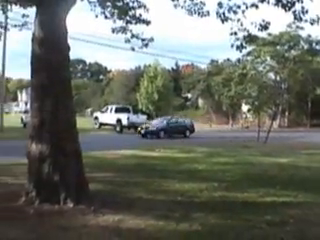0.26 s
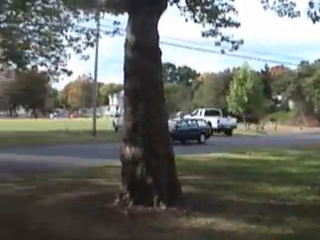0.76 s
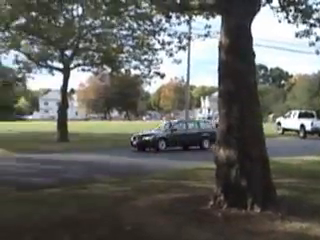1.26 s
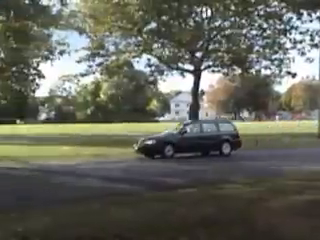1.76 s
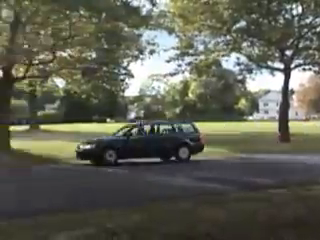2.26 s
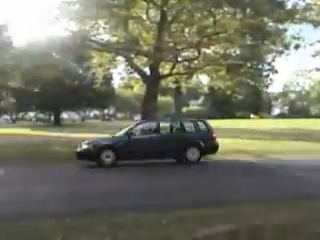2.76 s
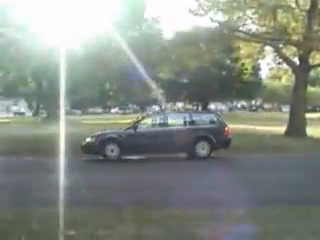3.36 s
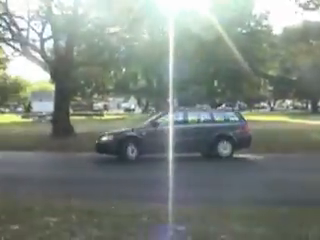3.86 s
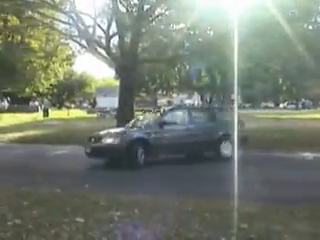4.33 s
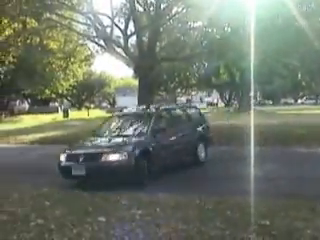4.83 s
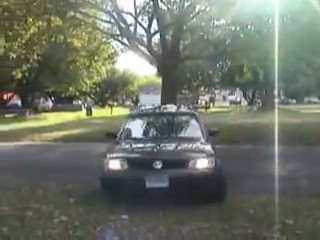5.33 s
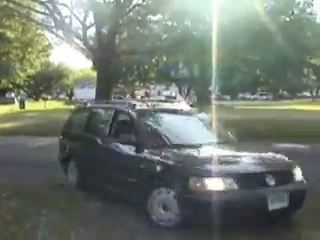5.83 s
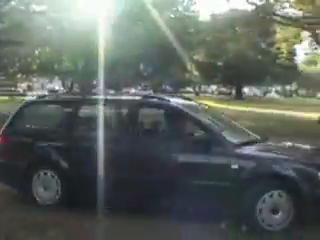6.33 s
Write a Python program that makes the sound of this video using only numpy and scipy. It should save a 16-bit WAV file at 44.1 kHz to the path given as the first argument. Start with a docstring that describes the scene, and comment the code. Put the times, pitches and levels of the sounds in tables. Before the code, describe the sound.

A car sweeps past on asphalt, slows, turns with a stuttering tyre squeal, and rolls up close with whining brakes, crackling dry leaves and an idling engine nearby.

```python
"""Tyres roar and hiss over asphalt as an estate car crosses a park, lifts off and swings round with a squeal.
Its brakes sing as it rolls onto a lawn close to a camera, where dry leaves crunch and twigs snap.
Another engine idles nearby throughout, a small motor hums faintly, and wind buffets the microphones.
Tyres, leaves and knocks are shaped noise, clicks and ringing modes; squeal and brakes are unsteady tones.
Engines and motor are harmonics of a slowly wandering rate."""
import sys
import numpy as np
from scipy import signal
from scipy.fft import rfft, irfft
from scipy.io import wavfile

SR = 44100
rng = np.random.default_rng(int(sys.argv[2]) if len(sys.argv) > 2 else 0)


def to_wav(s):
    """Save 16-bit WAV."""
    ch = np.atleast_2d(s).T  # columns
    pcm = np.round(np.clip(ch, -1, 1) * 32767)  # PCM
    wavfile.write(sys.argv[1], SR, pcm.astype(np.int16))


N = 290619
T = np.arange(N) / SR  # seconds
HZ = np.fft.rfftfreq(N, 1 / SR)


def wheels(grit_db=-2.0):
    """Everything the four tyres do on asphalt and lawn, with grit popping from under them."""
    # Pops: grit from under the tyres, plus clicks heard with the case ticks at 0.79 and 4.87 s. # Each row:
    # start in seconds, peak in dB before the grit trim.
    pop_rows = [(.7931, -17.5), (1.6202, -12.5), (2.3645, -20), (2.828, -17.5), (3.1418, -24),
                (4.8653, -26)]
    # Spectrum of a pop. Each row: frequency in Hz, density in dB per Hz.
    pop_colour = [(1500, -20), (3800, 6), (5000, 4.5), (6500, 8), (8000, 0.5), (11000, -28)]
    pops = cracks(pop_rows, pop_colour, decay=0.0029, tail_db=-7.0, tail=0.026)
    return rolling() + tread_drone() + tyre_squeal() + leaves() + flares() + gain_of(grit_db) * pops + knocks()


def rolling(roar_db=-1.5, hiss_db=1.5, rumble_db=1.0, fizz_db=-30.5):
    """Tread roar, air pumped out of the grooves, body rumble and fine grit; humps load the tyres."""
    # Tyre loudness, rising with the car's pull and sinking as it slows. Each row: time in seconds, gain in dB.
    tyre_rows = [(0, -29.5), (.75, -30), (1.06, -32.5), (1.3, -29.5), (1.47, -27), (1.9, -26),
                 (2.45, -27.5), (3.05, -32.5), (3.5, -33.5), (4.35, -29), (4.8, -34), (6.59, -38.5)]
    # Brightness, added to the hiss and taken from the roar. Each row: time in seconds, shift in dB.
    bright_rows = [(0, 0), (1.8, 0.66), (3, -3.5), (4.2, -1.5)]
    # Body and road rumble. Each row: time in seconds, gain in dB.
    rumble_rows = [(0, -29.5), (2.2, -30.5), (2.9, -28.5), (4.1, -28), (4.4, -31.5), (6.59, -31.5)]
    # Wheels heaving over the verge and humps in the lawn.
    # Each row: centre in seconds, extra roar in dB, half-length in seconds, extra rumble in dB.
    humps = [(4.92, 3.5, .13, 6), (5.127, 6.5, 0.1, 2), (5.92, 7, 0.13, -2), (6.382, 6.5, 0.055, 0.5)]
    # Spectra of roar, hiss, rumble and grit fizz. Each row: frequency in Hz, density in dB per Hz.
    roar_colour = [(200, -19), (480, -6.5), (650, 2.5), (800, 4), (920, -0.5), (1100, -10), (1500, -11),
                   (3000, -57.5)]
    hiss_colour = [(500, -13.5), (900, -0.5), (1200, -1), (1550, -2), (1900, -2), (2250, -6), (2700, -4),
                   (3300, -13.5), (4300, -15.5), (5300, -21.5), (6700, -22.5), (8500, -56), (12000, -67.5)]
    rumble_colour = [(15, -36), (33, -13), (55, -4), (85, 2.5), (115, -3), (180, 3.5), (250, 0),
                     (340, -2.5), (500, -7.5), (900, -17), (2500, -66.5)]
    fizz_colour = [(300, -5), (1500, -0.5), (3000, -4), (4200, -4.5), (5300, -8), (6700, -8), (7600, -11),
                   (8800, -24), (11000, -38.5)]

    tyres_db, bright_db = curve(tyre_rows), curve(bright_rows)
    load_db = sum(db * swell(s, length) for s, db, length, _ in humps)
    heave_db = sum(db * swell(s, length) for s, _, length, db in humps)
    # the fizz grows by 1.5 dB per second as the car nears, and follows a share of the tyre loudness
    near_db = 1.5 * T + 0.29 * tyres_db
    roar_gain = gain_of(roar_db + tyres_db - bright_db + load_db + 1.0 * drift(48))
    roar = roar_gain * noise(roar_colour)
    hiss_gain = gain_of(hiss_db + tyres_db + bright_db + 0.5 * drift(25))
    hiss = hiss_gain * noise(hiss_colour)
    rumble_gain = gain_of(rumble_db + heave_db + 0.75 * drift(24)) * level(rumble_rows)
    rumble = rumble_gain * noise(rumble_colour)
    fizz_gain = gain_of(fizz_db + near_db + 1.4 * drift(10.8))
    fizz = fizz_gain * evened(colour(grains(14000, 0.58), fizz_colour))
    return roar + hiss + rumble + fizz


def tread_drone(width=66.0):
    """The tread pattern drums a fuzzy low note whose pitch moves with the wheels."""
    # The drone. Each row: time in seconds, pitch in Hz, level in dB.
    drone_rows = [(2.1, 320, -50), (2.45, 300, -33), (3.15, 215, -32), (3.7, 195, -34), (4.2, 200, -46),
                  (4.549, 235, -29), (4.9, 215, -40.5), (5.15, 300, -26), (5.4, 320, -50.5)]
    s, hz, db = np.transpose(drone_rows)
    return gain_of(np.interp(T, s, db)) * fuzzy_tone(np.interp(T, s, hz), width)


def tyre_squeal(scrub_follow=0.96):
    """The front tyre grabs and lets go in gliding yelps, over a fuzzy tread ring and scrubbing rubber."""
    # The yelps. Each row: centre in seconds, gain in dB, half-length in seconds, pitch in Hz,
    # glide to either side in Hz, roughness (share of full pitch jitter), extra overtones in dB.
    yelps = [(3.733, -21, 0.038, 925, 30, 0.4, -1), (3.772, -15, 0.014, 958, 8, 0.3, 16.5),
             (3.803, -17, 0.021, 1015, 20, 0.47, 10), (3.847, -17.5, 0.026, 1080, 10, 0.55, 2),
             (3.918, -16.5, 0.02, 1061, 20, 0.29, 13.5), (3.954, -14, 0.0282, 1090, -10, 0.29, 8.5),
             (4.008, -10.5, 0.023, 976.3, -20, 0.57, 7.5), (4.038, -12, 0.0114, 950, -15, 0.71, -3),
             (4.089, -12.5, 0.015, 1000, 10, 0.92, 2.5), (4.132, -16, 0.018, 995, -35, 0.69, -2),
             (4.157, -10, .015, 952.5, -10, 0.22, 3), (4.194, -22.5, .03, 910, -10, .8, 3),
             (4.235, -20, 0.011, 905, 5, 0.38, 19.5), (4.251, -14, 0.01304, 950, -15, 1.1, 6),
             (4.299, -26, 0.024, 870, -20, 0.74, 8), (4.386, -23.5, .016, 835, 10, 0.37, 6),
             (4.425, -20, 0.023, 840, -10, 0.25, 0), (4.525, -26.5, 0.042, 880.2, 20, 0.28, 0),
             (5.123, -28, 0.041, 900, -10, 0.8, 2), (6.375, -29, .03, 865, 10, .6, 5)]
    # Spectrum of the scrub. Each row: frequency in Hz, density in dB per Hz.
    scrub_colour = [(500, -20), (720, -2), (830, 6), (1080, 2.5), (1250, -4.5), (1550, -1.5), (1900, 1),
                    (2300, -2), (2750, -1.5), (3400, -14), (6500, -26.5), (9000, -58)]
    slide_start_s, slide_end_s, attack_s, release_s = 3.71, 4.23, 0.092, 0.38
    scrub_db, ring_db = -22.5, -11.5  # the ring is relative to the yelps' envelope
    ring_hz, ring_width = 1050, 76

    sizes = np.array([gain_of(db) * swell(s, length) for s, db, length, *_ in yelps])
    # where yelps overlap, the stronger one dominates pitch and roughness
    shares = sizes ** 2 + 1e-12
    shares /= shares.sum(axis=0)
    pitch = np.zeros(N)
    for share, (s, _, length, hz, glide, *_) in zip(shares, yelps):
        pitch += share * (hz + glide * np.tanh((T - s) / length))
    rough, edge_db = np.array([row[-2:] for row in yelps]).T @ shares
    grip = np.linalg.norm(sizes, axis=0)
    sliding = held(slide_start_s, slide_end_s, attack_s, release_s)
    scrub_gain = gain_of(scrub_db + 1.7 * drift(60)) * (sliding + scrub_follow * grip)
    scrub = scrub_gain * noise(scrub_colour)
    ring = gain_of(ring_db) * grip * sliding * fuzzy_tone(ring_hz, ring_width)
    return grip * stick_slip(pitch, rough, edge_db) + ring + scrub


def stick_slip(pitch, rough, edge_db, octave_db=-11.5, third_db=-21.0,
               main_db=-2.0, second_db=-11.5, second_ratio=0.92):
    """Tread blocks stick and slip at an unsteady rate; a second tyre sings lower."""
    # How the tyre radiates its squeal. Each row: frequency in Hz, gain in dB.
    tyre_body = [(600, -9.5), (800, 0.5), (1100, 2), (1500, -7), (1930, -0.5), (2120, -4.5), (2300, -14),
                 (2800, -5), (3600, -21.5)]
    out = np.zeros(N)
    # the second tyre is less loaded, so its pitch is less steady
    for ratio, db, unsteady in ((1, main_db, rough), (second_ratio, second_db, 1.5)):
        jitter = unsteady * (0.015 * drift(60) + 0.05 * drift(300))
        flutter = gain_of(4 * np.tanh(drift(180)))
        angle = turning(pitch * ratio * (1 + jitter))
        # a harder grab sharpens each slip and so lifts the overtones
        overtones = gain_of(octave_db) * np.sin(2 * angle) + gain_of(third_db) * np.sin(3 * angle)
        out += gain_of(db) * evened(flutter) * (np.sin(angle) + gain_of(edge_db) * overtones)
    return np.sqrt(2) * colour(out, tyre_body)


def flares():
    """Patches of asphalt make one tyre resonance swell for a moment."""
    # The swells. Each row: centre in seconds, level in dB, half-length in seconds, pitch in Hz,
    # width setting of the fuzzy tone.
    flare_rows = [(0.523, -34, 0.32, 1497, 350.7), (1.544, -32, 0.15, 791, 80.2),
                  (1.741, -31, .1, 1815, 200), (2.038, -30.5, 0.13, 803, 90),
                  (2.276, -33, 0.092, 1218, 129.6), (4.07, -21.5, 0.077, 806, 45)]
    return sum(gain_of(db) * swell(s, length) * fuzzy_tone(hz, width) for s, db, length, hz, width in flare_rows)


def knocks(rattle=0.01):
    """A loose, rattling blow rings the suspension at each bump."""
    # Suspension knocks. Each row: start in seconds, gain in dB.
    knock_rows = [(3.158, -21), (5.111, -17.5), (5.135, -23), (5.243, -15), (5.255, -21.5), (6.037, -20)]
    # Suspension modes. Each row: frequency in Hz, relative level in dB, time to decay by 60 dB in seconds.
    modes = [(247, 5, 0.13), (458, 3, 0.045), (746, 2, 0.035), (910, -4.5, 0.043), (1090, 7.5, 0.016),
             (1310, 2.5, 0.021)]
    blow_colour = [(100, -10.5), (1400, 7), (2100, -4.5), (8000, -35)]  # Hz, dB per Hz
    t = T[:SR // 5]
    ring = sum(gain_of(db - 60 * t / t60) * np.sin(2 * np.pi * hz * t) for hz, db, t60 in modes)
    blows = cracks(knock_rows, blow_colour, decay=rattle, tail_db=-30, tail=0.013)
    return gain_of(-4.0) * signal.oaconvolve(blows, ring / np.linalg.norm(ring))[:N]


def brake(edge_s=0.019):
    """Pads keep one disc mode ringing, lower and louder under pressure; a raspy overtone follows it."""
    # Pressure of the pads on the disc. Each row: time in seconds, share of full pressure.
    pad_rows = [(4.485, 0.28), (4.64, 0.62), (4.74, .55), (4.89, .27), (4.99, 0.02), (5.19, .4),
                (5.28, 0.14), (5.62, .13), (5.76, 0.91), (5.92, 0.89), (6.34, .58)]
    # The ringing builds up, or chokes if negative.
    # Each row: centre in seconds, extra level in dB, half-length in seconds.
    surges = [(4.532, 6, 0.046), (4.626, 4.5, 0.036), (4.754, 5, 0.026), (4.868, 7, 0.022),
              (5.008, -4, 0.037), (5.19, 9, 0.045), (5.597, 5, .025), (5.655, 2, .012), (5.734, 6.5, 0.017),
              (5.803, -13, 0.01), (5.83, 1.5, 0.018), (5.91, 14, 0.082), (6.075, 0, .03), (6.165, 6, 0.032),
              (6.215, -5, .012), (6.276, -14, .015)]
    disc_hz, sag_hz = 1790, 41  # pads barely touching; drop at full pressure
    disc_db, pressure_db = -37, 7  # pads barely touching; rise at full pressure
    # the overtone sounds while the wheels still turn fast
    rasp_start_s, rasp_end_s, rasp_fade_s = 4.58, 5.17, 0.16
    rasp_db, rasp_width = -36, 160  # level at full pressure

    pressure = curve(pad_rows)
    pitch = disc_hz - sag_hz * pressure
    angle = turning(pitch * (1 + 0.003 * drift(70) + 0.0012 * drift(14)))
    chatter_db = 1.3 * drift(90) + 1.1 * drift(25)
    surge_db = sum(db * swell(s, length) for s, db, length in surges)
    braking = held(pad_rows[0][0], pad_rows[-1][0], edge_s, edge_s)
    tone_gain = braking * gain_of(disc_db + pressure_db * pressure + surge_db + chatter_db)
    tone = np.sqrt(2) * tone_gain * np.sin(angle)
    rasp = fuzzy_tone(3 * pitch, rasp_width)
    fast = held(rasp_start_s, rasp_end_s, rasp_fade_s, rasp_fade_s)
    rasp_gain = gain_of(rasp_db + 1.2 * drift(40)) * np.sqrt(abs(pressure)) * fast
    return tone + rasp_gain * rasp


def leaves(crunch_db=-0.17):
    """Leaves crumple in clumps of tiny fractures; pressed into the soil they crack fewer and duller."""
    # Heaps crushed under a wheel. Each row: centre in seconds, gain in dB, half-length in seconds.
    heaps = [(5.278, -27.5, 0.051), (5.356, -32, 0.018), (5.475, -29, 0.029), (5.55, -22, 0.0085),
             (5.567, -26.5, 0.017), (5.718, -23, 0.025), (5.768, -25.5, 0.021), (5.795, -24.5, 0.0077),
             (5.84, -26.5, 0.032), (5.914, -24, 0.038), (5.967, -28, 0.024), (6.01, -27, .014),
             (6.126, -22.5, 0.033), (6.195, -29, 0.013), (6.264, -27.5, 0.033), (6.373, -26, 0.037),
             (6.504, -28, 0.0072), (6.576, -34, 0.011)]
    # Level of the leaves pressed into the soil. Each row: time in seconds, dB relative to the dry leaves.
    press_rows = [(5.1, -7), (5.7, -13), (6.1, -3), (6.59, -17)]
    # Spectra of dry and pressed leaves. Each row: frequency in Hz, density in dB per Hz.
    dry_colour = [(400, -5), (1200, -5.5), (2200, -3), (2700, -0.5), (3300, -10), (4500, -2), (5400, -1),
                  (6700, 2), (7800, -1.5), (9200, -12.5), (10300, -8.5), (11500, -22.5)]
    press_colour = [(1200, -9), (2700, -4), (3800, 1.5), (5000, -1), (7000, -4), (11000, -30)]
    lawn_s, carpet_db, attack_s = 5.135, -32, 0.016

    # a steady rustle once the wheels reach the lawn
    carpet = gain_of(carpet_db) * held(lawn_s, T[-1], attack_s, attack_s)
    power = carpet ** 2 + sum((gain_of(db) * swell(s, length)) ** 2 for s, db, length in heaps)
    fractures = grains(5500, 0.8) * gain_of(1.1 * drift(200))
    pressed = grains(2500, 1.0)
    crisp = evened(colour(fractures, dry_colour))
    dull = level(press_rows) * evened(colour(pressed, press_colour))
    return gain_of(crunch_db) * np.sqrt(power) * (crisp + dull)


def snaps(crumble_db=-22.5, crumble_s=0.0033):
    """A twig or stiff leaf breaks with one sharp click and crumbles for a few milliseconds."""
    # The snaps. Each row: start in seconds, click peak in dB, left minus right in dB.
    snap_rows = [(5.2675, -15, 0), (5.5456, -4, 0), (5.5515, -6, 0), (5.627, -9, -3.5), (5.6935, -6, 0),
                 (5.792, -9, 0), (5.887, -8, 2), (5.9659, -11, 2), (6.041, -12, -10), (6.086, -18, -6),
                 (6.107, -5, -11), (6.1174, -10, -3), (6.1372, -7, -4), (6.145, -13, 0), (6.192, -13, 0),
                 (6.4942, -8, 0), (6.4985, -9, 0)]
    # Colour of a snap. Each row: frequency in Hz, density in dB per Hz.
    snap_colour = [(800, -21), (2000, 1), (2900, 3.5), (5000, 0), (6800, 5), (8000, -11), (9500, -29),
                   (11500, -25)]
    out, t = np.zeros((2, N)), T[:SR // 20]
    for s, db, pan_db in snap_rows:
        crumble = gain_of(crumble_db) * np.exp(-t / crumble_s) * rng.standard_normal(len(t))
        burst = np.where(t == 0, 1, crumble)
        at = round(s * SR)
        out[:, at:at + len(t)] += gain_of([[db + pan_db / 2], [db - pan_db / 2]]) * burst[:N - at]
    click_peak = abs(colour(signal.unit_impulse(N), snap_colour)).max()
    return np.array([colour(side, snap_colour) for side in out]) / click_peak


def engine(second_db=-11.5, third_db=-19.0):
    """The car's exhaust note: three harmonics of a firing rate that falls unevenly as the car slows."""
    # The engine. Each row: time in seconds, mean firings per second, level in dB before a 2 dB cut.
    engine_rows = [(0, 76, -38), (.9, 77, -39), (1.3, 67, -37), (1.65, 65, -30), (1.9, 50, -32),
                   (2.1, 59, -35), (2.35, 41, -42), (2.6, 49, -40), (2.9, 31, -37), (3.1, 64, -56),
                   (4.8, 48, -38), (6.59, 34, -45)]
    s, hz, db = np.transpose(engine_rows)
    angle = turning(np.interp(T, s, hz) * (1 + 0.0092 * drift(8.1)))
    note = np.sin(angle) + gain_of(second_db) * np.sin(2 * angle) + gain_of(third_db) * np.sin(3 * angle)
    return np.sqrt(2) * gain_of(np.interp(T, s, db) - 2.0) * note


def idler(puff_db=-16.0, sharp=1.0, waver=0.0062):
    """Another engine idles steadily: low firing orders and a puff of exhaust at each firing."""
    # Loudness of the idle. Each row: time in seconds, gain in dB.
    idle_rows = [(0, -38.5), (1.4, -30.5), (2.35, -30), (2.8, -43.5), (4.5, -38), (5, -32), (6.59, -30)]
    # Firing orders. Each row: multiple of the firing rate, mean level in dB before the loudness curve.
    order_rows = [(1, -25), (2, -4), (3, -1), (4, -4), (5, -8.5), (6, -29), (7, -34), (8, -13.5)]
    puff_colour = [(50, 2.0), (120, 1.5), (220, -3.5), (450, -1.5), (1500, -19), (5000, -68)]  # Hz, dB per Hz
    firing_hz = 32.97  # mean
    angle = turning(firing_hz * (1 + waver * drift(3.8)))
    orders = sum(gain_of(db + 1.0 * drift(6.2)) * np.cos(k * angle) for k, db in order_rows)
    puffs = evened(np.exp(sharp * np.cos(angle)) * noise(puff_colour))
    return level(idle_rows) * (np.sqrt(2) * orders + gain_of(puff_db) * puffs)


def hum(waver_db=1.8):
    """Orders of one steadily turning small-motor shaft, each clearer for a while towards the end."""
    # Shaft orders. Each row: multiple of the shaft rate, full level in dB,
    # second at which it reaches full strength, second at which it begins to fade.
    shaft_orders = [(3, -41, 5.3, 5.94), (4, -39, 5.37, 6.45), (5, -39, 5.38, 6.59), (6, -39.5, 5.82, 6.13)]
    shaft_hz, rise_s, faint_db = 89.2, 0.16, -13
    out = np.zeros(N)
    angle = turning(shaft_hz * (1 + 0.0015 * drift(4)))
    for k, db, start, end in shaft_orders:
        entry = np.maximum(held(start, end, rise_s, rise_s), gain_of(faint_db))
        out += gain_of(db) * entry * evened(gain_of(waver_db * drift(4.2))) * np.sin(k * angle)
    return np.sqrt(2) * out


def wind(breeze_db=-46.0):
    """Puffs of air buffet the two ports, mostly pushing one as they pull the other."""
    # Puffs. Each row: centre in seconds, gain in dB, half-length in seconds.
    gusts = [(.25, -40, 0.064), (.97, -35, 0.052), (3.87, -32, 0.072), (4.304, -33, 0.07),
             (4.696, -28, 0.079), (5.049, -35, 0.24), (5.74, -28.5, 0.16), (6.08, -34, 0.15)]
    # Spectrum of the wind. Each row: frequency in Hz, density in dB per Hz.
    wind_colour = [(15, -16), (35, -3.5), (60, 9), (100, 11.5), (150, -2.5), (250, -8), (600, -53)]
    puffs = sum(gain_of(db) * np.exp(-((T - s) / length) ** 2) for s, db, length in gusts)
    force = gain_of(breeze_db) + puffs
    across, common = noise(wind_colour), gain_of(-7.0) * noise(wind_colour)
    return force * np.array([common + across, common - across])


def camera(ring_s=0.013, waver=0.05):
    """The case ticks in the hand; ticks and a faint early low hum reach the ports with opposite signs."""
    # Ticks of the case. Each row: start in seconds, peak in dB.
    tick_rows = [(.7931, -9), (3.7234, -14), (4.8653, -11)]
    # Spectrum of the case. Each row: frequency in Hz, density in dB per Hz.
    case_colour = [(150, -12), (380, 3), (550, 1), (750, 12), (1200, -7), (2100, -1), (3100, -4),
                   (5000, -48)]
    hum_hz, hum_db, hum_start_s, hum_end_s = 168, -34, 0.3, 1.21  # mean pitch, mean peak level
    ticks = cracks(tick_rows, case_colour, decay=ring_s, tail_db=-13, tail=0.02)
    angle = turning(hum_hz * (1 + waver * drift(8.2)))
    hum_gain = gain_of(hum_db + 2.5 * drift(7.8)) * held(hum_start_s, hum_end_s, 0.14, 0.03)
    low_hum = hum_gain * np.sin(angle)
    return np.array([ticks + low_hum, -ticks - low_hum])


def microphones(direct, scattered):
    """Two close ports hear the direct sound unequally, and scattered sound with opposite signs."""
    # Balance. Each row: frequency in Hz, left minus right in dB.
    balance = [(60, 0), (200, -0.5), (350, -0.7), (630, -4), (1100, -5.5), (2000, -5), (3650, -0.5),
               (6600, -2.2), (11800, -10)]
    # Scattering. Each row: frequency in Hz, share of scattered sound as a gain.
    scatter = [(30, .5), (80, 0.39), (150, 0.24), (280, 0.14), (600, 0.56), (1000, 0.17), (2000, 0.32),
               (4000, 0.29), (7000, 0.42), (10000, 0.64)]
    # Phase. Each row: frequency in Hz, lead of the left port in radians.
    lead = [(50, 0.15), (300, -0.4), (690, 0.047), (950, -1.18), (1210, -0.53), (2070, -0.31),
            (2400, -0.043), (3800, -0.65), (7000, -0.21), (9000, -.5)]
    side = rfft(scattered) * read(scatter, HZ)
    tilt = gain_of(read(balance, HZ) / 2)
    turn = np.exp(1j * read(lead, HZ) / 2)
    left, right = tilt * turn, turn.conj() / tilt
    # keep the mean of both ports as loud as the direct sound
    middle = rfft(direct) * 2 / abs(left + right)
    return irfft(np.array([left * middle + side, right * middle - side]), N)


def narrowed(pair):
    """The stereo picture closes up twice by scaling the difference between the sides."""
    # Stereo width. Each row: time in seconds, gain of the left-right difference in dB.
    width_rows = [(5.3, 0), (5.44, -14), (5.56, 0), (6.14, 1), (6.27, -10), (6.59, -6)]
    middle = pair.mean(axis=0)
    return middle + (pair - middle) * gain_of(curve(width_rows))


def gain_of(db):
    """Decibels to amplitude."""
    return 10 ** (np.asarray(db) / 20)


def evened(x):
    """Scales to rms 1."""
    return x / np.sqrt(np.mean(x ** 2) + 1e-20)


def turning(hz):
    """Running phase in radians of a tone with a moving pitch."""
    return 2 * np.pi * np.cumsum(hz) / SR


def read(points, hz):
    """A spectrum, joined on a log-frequency axis."""
    f, value = np.transpose(points)
    return np.interp(np.log(hz + 1), np.log(f + 1), value)


def curve(rows):
    """A control at every sample, in straight lines between its points."""
    return np.interp(T, *np.transpose(rows))


def level(rows):
    """A dB curve as a gain that fades out beyond its ends."""
    outside = np.maximum(rows[0][0] - T, 0) + np.maximum(T - rows[-1][0], 0)
    return gain_of(curve(rows)) * np.exp(-outside / 0.02)


def swell(s, length):
    """A bell of height 1 around a moment, down to 1/e one length to either side."""
    out, near = np.zeros(N), slice(*np.searchsorted(T, [s - 5 * length, s + 5 * length]))
    out[near] = np.exp(-((T[near] - s) / length) ** 2)
    return out


def held(start, end, attack, release):
    """An envelope that grows until start, holds at 1, and dies away after end."""
    return np.exp(-np.maximum(start - T, 0) / attack - np.maximum(T - end, 0) / release)


def drift(rate):
    """Random wander of rms 1, low-passed at about 0.7 times rate in Hz."""
    steps = rng.standard_normal(int(12 * rate * T[-1]) + 40)
    slow = signal.lfilter(*signal.butter(2, 0.7, fs=12), steps)[20:]  # skip the filter's start-up
    return evened(np.interp(T, np.linspace(0, T[-1], len(slow)), slow))


def fuzzy_tone(hz, width):
    """Noise of rms near 1 in a narrow band that follows hz, about 1.4 times width across in Hz."""
    angle = turning(hz * np.ones(N))
    return drift(width) * np.cos(angle) + drift(width) * np.sin(angle)


def colour(x, points):
    """Causal minimum-phase filter with the given spectrum."""
    log_gain = np.log(gain_of(read(points, abs(np.fft.fftfreq(4096, 1 / SR)))))
    taps = np.fft.ifft(np.exp(np.conj(signal.hilbert(log_gain)))).real
    return signal.oaconvolve(x, taps[:len(taps) // 2])[:N]


def noise(points):
    """Coloured noise of rms 1."""
    return evened(colour(rng.standard_normal(N), points))


def grains(per_s, spread_db):
    """Random clicks, a few larger than the rest."""
    size = gain_of(spread_db * np.minimum(rng.exponential(1, N), 4))
    return evened(size * rng.standard_normal(N) * (rng.random(N) < per_s / SR))


def cracks(rows, points, decay, tail_db, tail):
    """Each fracture is a sharp noise burst followed by a softer crumble; decay and tail in seconds."""
    out, grit, t = np.zeros(N), noise(points), T[:SR // 8]
    shape = np.exp(-t / decay) + gain_of(tail_db) * np.exp(-t / tail)
    for s, db in rows:
        at = round(s * SR)
        burst = grit[at:at + len(t)] * shape[:N - at]
        out[at:at + len(t)] += gain_of(db) * burst / abs(burst).max()
    return out


def scene(idle_scatter_db=-5.5):
    """The car and its surroundings; wheels, idle and hum also arrive scattered by ground and trees."""
    # scattered sound is drawn afresh, so it is unrelated in detail to the direct sound
    car = microphones(wheels() + brake() + engine(), wheels())
    around = microphones(idler() + hum(), gain_of(idle_scatter_db) * (idler() + hum()))
    return narrowed(car + around + wind()) + snaps() + camera()


def record(dry):
    """Peaks are clipped at full scale, then the treble is cut off."""
    edge_hz = 11600
    low_pass = signal.firwin(301, edge_hz, window=("kaiser", 8), fs=SR)
    return signal.oaconvolve(np.clip(dry, -1, 1), low_pass[None], "same")


dry = scene()
out = record(dry)
to_wav(out)
```